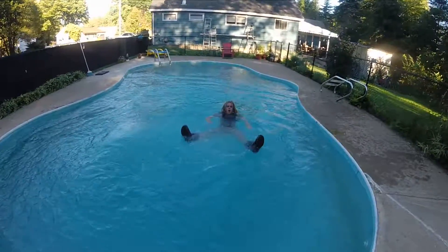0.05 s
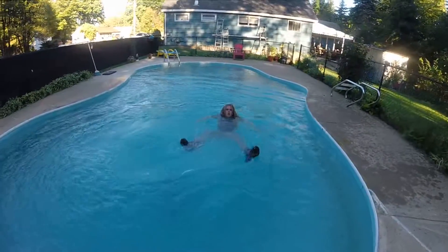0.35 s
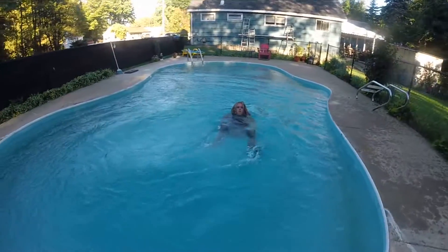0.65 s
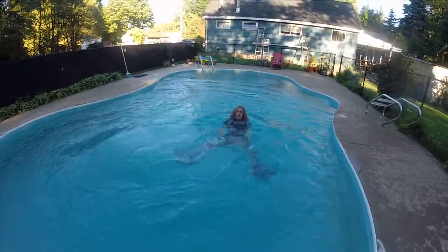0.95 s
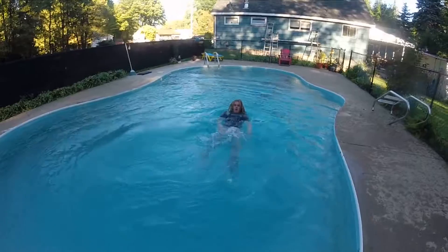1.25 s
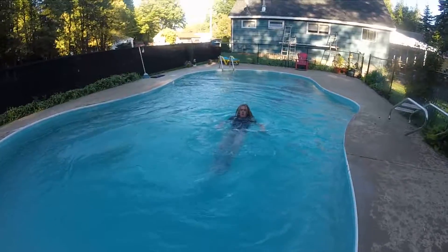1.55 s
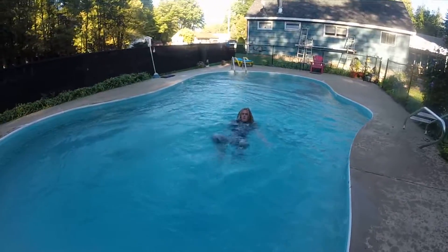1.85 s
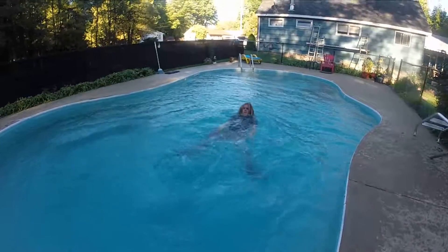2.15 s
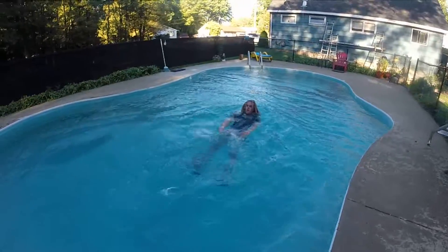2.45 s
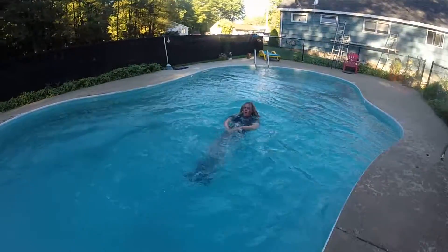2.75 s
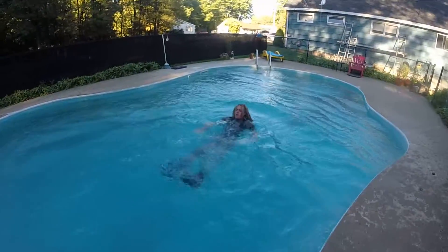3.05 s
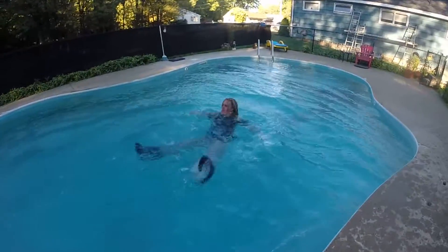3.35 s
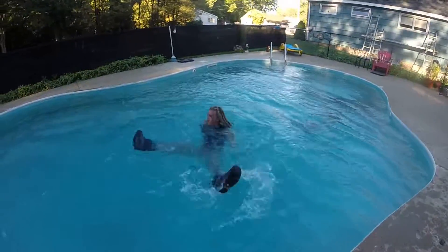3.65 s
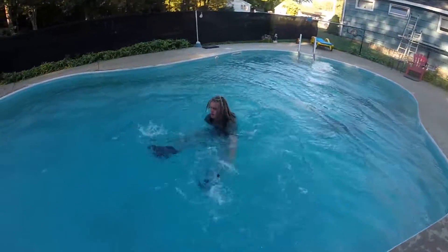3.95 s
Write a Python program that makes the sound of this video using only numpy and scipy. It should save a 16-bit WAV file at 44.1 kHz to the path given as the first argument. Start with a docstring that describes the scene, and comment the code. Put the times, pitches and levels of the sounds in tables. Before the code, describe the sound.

A swimmer's soft paddling grows into splashing, over light knocks and low handling rumble.

```python
"""An outdoor pool, where a swimmer paddles and kicks: a soft wash with a few small splashes grows
into steady splashing. The water is a fizz of noise and tiny ringing drops, with bubbles that ping
and air pockets that gulp. It is heard through a closed camera case that rings near 2-3 kHz.
The case is carried along the edge: it knocks faintly in its mount, rumbles, and thumps with
each step. Behind it all is the hush of still air."""
import sys
import numpy as np
from scipy import signal
from scipy.fft import rfft, irfft, next_fast_len
from scipy.io import wavfile
from scipy.ndimage import map_coordinates

SR = 44100
rng = np.random.default_rng(int(sys.argv[2]) if len(sys.argv) > 2 else 0)


def generate_wav(sig):
    """Save sig (samples, or channels by samples) to the path in sys.argv[1] as 16-bit PCM at SR."""
    pcm = np.round(np.clip(np.atleast_2d(sig).T, -1, 1) * 32767).astype(np.int16)
    wavfile.write(sys.argv[1], SR, pcm)


N = 176400  # 4 seconds
T = np.arange(N) / SR

# How loud the wash is over time: time_s, level_db
WASH_LEVEL = [(0, -71), (.36, -70.5), (.5, -61), (.68, -62), (.9, -63.5), (1.3, -62.5), (1.48, -62.5),
              (1.6, -69.5), (1.9, -65.5), (2.16, -61), (2.42, -64), (2.6, -61), (2.86, -65.5),
              (3.06, -59.5), (3.33, -63.5), (3.53, -56), (3.63, -54), (3.8, -51), (4, -52.5)]
# Single splashes: peak_s, level_db, rise_s, fall_s
SPLASHES = [(.51, -67, .008, .012), (0.563, -49, 0.0082, 0.02), (.66, -55.5, 0.015, 0.036),
            (0.813, -59, 0.0023, 0.0049), (1.062, -51, 0.04, 0.028), (1.519, -52.5, .008, 0.0076),
            (2.135, -57, 0.0088, 0.011), (2.211, -50, 0.0072, 0.039), (3.094, -48.5, 0.0018, 0.0023),
            (3.16, -60, .008, .012), (3.391, -53.5, 0.0051, 0.053), (3.6, -57, 0.011, .015),
            (3.65, -53, 0.014, 0.018), (3.803, -52, 0.0064, 0.013), (3.92, -48, 0.0096, .01)]
# How the wash, wavelets and splashes each change the water's tone: frequency_hz, gain_db
WASH_TONE = [(500, 0.5), (2500, 1), (5000, -1), (8000, 6.5), (13000, -7.5)]
WAVELET_TONE = [(500, -3), (2000, -13), (2700, 0), (4500, -1), (8000, -2), (13000, -6)]
SPLASH_TONE = [(500, -0.42), (2500, 1), (5000, -1.7), (8000, -2.3), (13000, -1.2)]

def swimmer():
    """The wash follows the swimmer's effort; wavelets lap on it and strokes throw up splashes."""
    wash_level = amp(np.interp(T, *np.transpose(WASH_LEVEL)))
    wavelet_level = wash_level * np.sqrt(wavelet_power())
    splash_power = sum((amp(db) * swell(s, rise, fall)) ** 2 for s, db, rise, fall in SPLASHES)
    wash = wash_level * spray(WASH_TONE)
    wavelets = wavelet_level * spray(WAVELET_TONE)
    splashes = np.sqrt(splash_power) * spray(SPLASH_TONE)
    flicker_db = -0.18 * wobble(per_s=45)
    return (wash + wavelets + splashes) * amp(flicker_db)


def wavelet_power(count=120, per_s=20, rise_s=0.00033, fall_s=0.0061):
    """Little waves break at random, each a quick burst of power compared with the wash."""
    times = np.cumsum(rng.exponential(1 / per_s, count))
    sizes = amp(-1.5 + 4.5 * np.clip(rng.standard_normal(count), -2, 2))
    starts = np.bincount((times * SR).astype(int), sizes ** 2, N)[:N]
    t = T[:SR // 10]
    burst = 2 * (1 - np.exp(-t / rise_s)) * np.exp(-t / fall_s)
    return np.abs(signal.fftconvolve(starts, burst ** 2)[:N])


# The basic tone of splashing water: frequency_hz, gain_db
WATER_TONE = [(200, -11.5), (500, -9), (1000, -12), (1500, -11.5), (2200, -7), (3200, -13), (5000, -11),
              (7000, -22.5), (9000, -19.5), (10700, -23.5), (12300, -12.5), (14000, -27), (15000, -56)]

def spray(tone):
    """Fizz and droplets, heard through the case."""
    fizz = rng.standard_normal(N) + amp(-2.5) * droplets()
    return unit(filtered(fizz, lambda hz: colour(WATER_TONE, hz) * colour(tone, hz) * case_ring(hz)))


def droplets(count=6000, per_s=900, middle_hz=3666, ring_cycles=13.6):
    """Crowds of tiny bubbles and drops each ring briefly, fading by 60 dB in ring_cycles swings."""
    t = np.arange(400) / SR
    gaps, strengths = -np.log(rng.random((count, 2))).T
    start_s = np.cumsum(gaps) / per_s
    hz = np.clip(middle_hz * np.exp(0.62 * rng.standard_normal(count)), 400, 14000)[:, None]
    size = amp(4 * np.minimum(strengths, 4))[:, None]
    fade = np.exp(-np.log(1000) * hz * t / ring_cycles)
    rings = size * np.sqrt(hz) * np.sin(2 * np.pi * hz * t) * fade
    samples = (start_s * SR).astype(int)[:, None] + np.arange(len(t))
    return unit(np.bincount(samples.ravel(), rings.ravel(), N)[:N])


# Single bubbles (each peaks about 10 dB below its strength): start_s, strength_db, pitch_hz
BUBBLES = [(.506, -39, 1820), (0.558, -36, 2660), (2.969, -41.5, 2600), (3.28, -42, 2640),
           (3.436, -38.5, 2580), (3.661, -32.5, 2750)]

def bubbles(rise_s=0.0028, fall_s=0.004):
    """Single bubbles burst with a short ping."""
    out = np.zeros(N)
    for start_s, db, hz in BUBBLES:
        t = np.maximum(T - start_s, 0)
        shape = (1 - np.exp(-t / rise_s)) * np.exp(-t / fall_s)
        out += amp(db) * shape * np.sin(2 * np.pi * hz * t)
    return out


# Air pockets under the strokes: peak_s, level_db, pitch_hz, length_s
GULPS = [(0.646, -60, 800, 0.029), (1.048, -53.5, 603, 0.042), (2.273, -59, 530, 0.017)]

def gulps():
    """Larger air pockets ring low and briefly."""
    return sum(amp(db) * bell(T, s, length / 2) * noise(lambda hz: bell(hz, pitch, .15 * pitch))
               for s, db, pitch, length in GULPS)


# Ticks of spray: peak_s, level_db
TICKS = [(2.978, -67), (3.094, -71), (3.933, -50.5)]
# Their bright tone: frequency_hz, gain_db
TICK_TONE = [(2000, -16), (8000, -10), (12500, 5), (15000, -11)]

def spray_ticks(fall_s=0.0012):
    """Spray makes sharp ticks, each a tiny burst of hiss."""
    hiss = noise(lambda hz: colour(TICK_TONE, hz))
    return hiss * sum(amp(db) * swell(s, fall_s / 2, fall_s) for s, db in TICKS)


# Pitches the case boosts or dulls: centre_hz, width_hz, gain_db
CASE_RINGS = [(1740, 99, 5.5), (1932, 142, 9), (2530, 184, 9), (2817, 350, 6.5), (3660, 70, 2),
              (3700, 400, -4), (4490, 150, 5.5), (4935, 157, 5), (5200, 120, 0.5), (5380, 190, 8),
              (5600, 170, 0), (6520, 880, 6), (7580, 250, 3), (8140, 150, -2.5)]

def case_ring(hz):
    """The closed case rings: this is how much it lifts or lowers each frequency."""
    return amp(sum(db * bell(hz, centre, width / 2) for centre, width, db in CASE_RINGS))


# Knocks, before knock() boosts them: start_s, thud_db, thud_hz, body_db, click_db, click_hz, snap_db
KNOCKS = [(0.0612, -43, 130, -37.5, -31.5, 1140, -43.5), (0.1858, -35.5, 160, -66, -39.5, 1000, -52),
          (0.2239, -49, 153, -60, -36.5, 1200, -51), (0.3187, -35.5, 162, -50, -55, 1210, -67),
          (0.378, -46.5, 190, -52, -52.5, 1000, -66), (0.4493, -45, 145, -35, -40.5, 1380, -42),
          (0.497, -43.5, 148, -56, -61, 1200, -60), (.789, -50, 170, -68, -60, 1230, -60),
          (0.918, -45, 173, -44.5, -33, 1240, -55), (1.112, -48, 225, -43.5, -55, 1000, -65),
          (1.1886, -35, 166, -48, -61, 1000, -62), (1.2248, -46, 170, -48, -49, 1250, -55),
          (1.6883, -35, 141, -41.5, -31, 1190, -63), (1.891, -47, 190, -66, -48, 1250, -58),
          (2.199, -45, 230, -41, -61, 1000, -43), (2.2974, -40.5, 190, -45.5, -59, 1000, -60),
          (2.328, -45, 237, -55, -65, 1000, -58), (2.5875, -33.5, 287, -58, -47.5, 1110, -58),
          (2.7999, -45, 220, -46, -47, 1200, -58), (2.993, -40.5, 190, -54, -59, 1200, -63),
          (3.0925, -39, 168, -46.5, -54, 1400, -41.5), (3.189, -42.5, 190, -42, -49, 1090, -55),
          (3.564, -34, 290, -44.5, -38, 1000, -60), (3.7685, -36, 284, -53, -51, 1070, -60)]
# A typical rattle, before the same boost: thud_db, body_db, click_db
RATTLE_LEVELS = [-52, -63.5, -65.5]

def mount_knocks(rattles=44, scatter_db=4):
    """The case knocks in its mount, with fainter rattles at random times."""
    out = sum(knock(*row) for row in KNOCKS)
    times = rng.random(rattles) * N / SR
    levels = RATTLE_LEVELS + scatter_db * rng.standard_normal((rattles, 3))
    for s, (thud, body, click) in zip(times, levels):
        out += knock(s, thud, thud_hz=190, body_db=body, click_db=click, click_hz=1000, snap_db=-np.inf)
    return out


def knock(start_s, thud_db, thud_hz, body_db, click_db, click_hz, snap_db, boost_db=2.5):
    """One dull knock: four tones swell and die in a cycle or two; neighbours swing opposite ways."""
    out, t = np.zeros(N + SR), np.arange(SR // 25) / SR
    tones = [(thud_hz, 0.0012, thud_db), (623, 0.00048, body_db),
             (click_hz, 0.00039, click_db), (2270, 0.00017, snap_db)]
    for k, (hz, swell_s, db) in enumerate(tones):
        age = t / swell_s
        shape = (age / 2) ** 2 * np.exp(2 - age)
        pitch = hz * np.exp(0.054 * rng.standard_normal())
        sag = 0.15 * (2 - age / 2) if k == 0 else 0  # the thud falls in pitch as it dies
        ring = shape * np.sin(2 * np.pi * pitch * t * (1 + sag))
        out[int(start_s * SR):][:len(t)] += (-1) ** k * amp(db + boost_db) * ring
    return out[:N]


# Steps felt through the mount: peak_s, level_db, pitch_hz, rise_s, fall_s
STEPS = [(.588, -26.5, 32.6, 0.012, 0.023), (1.643, -30.5, 39, 0.032, 0.043),
         (2.698, -24.5, 39.8, 0.015, 0.016), (3.209, -28, 42.6, 0.015, 0.021),
         (3.735, -23, 38.9, 0.015, 0.037)]

def footsteps():
    """Each step sways the mount in a deep thump."""
    return sum(amp(db) * bell(T, s, np.where(T < s, rise, fall)) * np.sin(2 * np.pi * hz * (T - s))
               for s, db, hz, rise, fall in STEPS)


# Soft bumps, before the boost: peak_s, level_db, pitch_hz
BUMPS = [(0.043, -46, 71), (0.126, -44, 65), (.51, -37, 55), (0.799, -39, 89), (1.13, -37.5, 54.6),
         (1.199, -36.5, 73.5), (1.295, -39.5, 85.5), (1.425, -42, 59.5), (1.686, -42.5, 85),
         (1.819, -42, 82), (2.142, -43, 109), (2.195, -38.5, 65), (2.602, -41.5, 84), (2.81, -40, 84),
         (3.041, -45.5, 75)]

def handling_bumps(fall_s=0.0085, boost_db=5.5):
    """Handling the case makes soft, low bumps."""
    return sum(amp(db + boost_db) * swell(s, fall_s / 2, fall_s) * np.sin(2 * np.pi * hz * (T - s))
               for s, db, hz in BUMPS)


# How loud the rumble is, before the boost: time_s, level_db
RUMBLE_LEVEL = [(0.0, -48.5), (0.48, -48), (0.67, -50), (1.56, -50.5), (1.93, -49), (2.19, -48),
                (2.35, -48), (2.68, -49), (2.84, -49), (3.45, -51.5), (3.7, -49), (4.0, -52.5)]
# Its deep tone: frequency_hz, gain_db
RUMBLE_TONE = [(15, -4.5), (35, 3), (58, -2), (85, -2), (130, -12), (250, -22.5), (500, -28), (1500, -54)]

def handling_rumble(boost_db=4):
    """The case rumbles all the time as it is carried."""
    level_db = np.interp(T, *np.transpose(RUMBLE_LEVEL)) + boost_db
    return amp(level_db) * noise(lambda hz: colour(RUMBLE_TONE, hz))


# The tone of still outdoor air: frequency_hz, gain_db
AIR_TONE = [(100, 5), (300, 0), (700, -1.5), (1300, -4.5), (2200, -11), (4000, -12.5), (7000, -26),
            (10000, -24.5), (14000, -27.5)]

def air(hush_db=-57.5, whine_db=-89.5, whine_hz=10490):
    """A steady outdoor hush, lightly shaped by the case, and a faint high whine."""
    hush = amp(hush_db) * noise(lambda hz: colour(AIR_TONE, hz) * case_ring(hz) ** .5)
    return hush + amp(whine_db) * noise(lambda hz: bell(hz, whine_hz, width=30))


def amp(db):
    """Turn decibels into a number to multiply by."""
    return 10 ** (np.asarray(db) / 20)


def unit(x):
    """Scale a sound to an average (rms) level of 1."""
    return x / np.sqrt(np.mean(x ** 2) + 1e-20)


def colour(tone, hz):
    """Read the gain at any frequency from a tone table."""
    points_hz, points_db = np.transpose(tone)
    return amp(np.interp(np.log(hz + 1), np.log(points_hz + 1), points_db))


def wobble(per_s):
    """A smooth curve through per_s random values a second."""
    return map_coordinates(rng.standard_normal(int(N * per_s / SR) + 4), [T * per_s])


def filtered(x, gain):
    """Turn each frequency of x up or down by gain(hz)."""
    size = next_fast_len(N + SR // 2)
    return irfft(rfft(x, size) * gain(np.fft.rfftfreq(size, 1 / SR)), size)[:N]


def noise(gain):
    """Noise shaped by gain(hz), at level 1."""
    return unit(filtered(rng.standard_normal(N), gain))


def bell(x, centre, width):
    """A smooth hump of height 1."""
    return np.exp(-.5 * ((x - centre) / width) ** 2)


def swell(peak_s, rise_s, fall_s):
    """A loudness curve that rises to a peak and dies away."""
    return np.where(T < peak_s, bell(T, peak_s, rise_s), np.exp(-np.abs(T - peak_s) / fall_s))


def scene():
    """Air, the carried case and the water, all at one microphone."""
    background = air() + footsteps() + handling_rumble() + handling_bumps()
    water = swimmer() + gulps() + bubbles() + spray_ticks()
    return (background + water + mount_knocks())[None]


def record(dry):
    """The camera keeps nothing above its highest frequency."""
    top_hz = 14950
    return filtered(dry[0], lambda hz: hz < top_hz)[None]


dry = scene()
out = record(dry)
generate_wav(out)
```